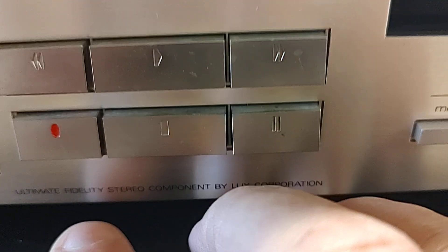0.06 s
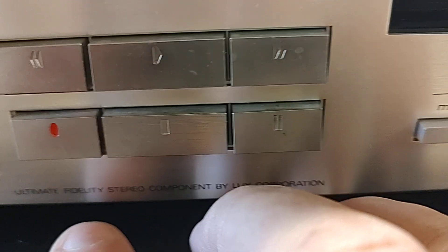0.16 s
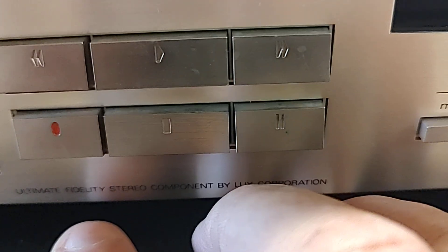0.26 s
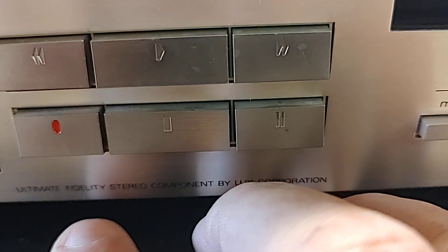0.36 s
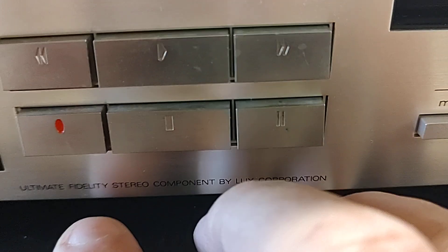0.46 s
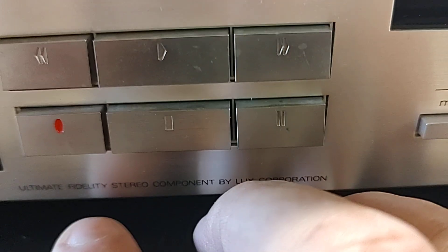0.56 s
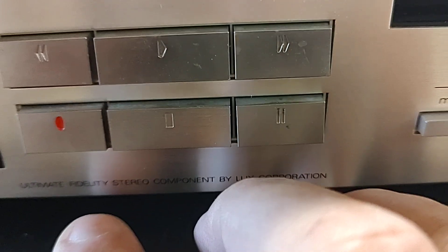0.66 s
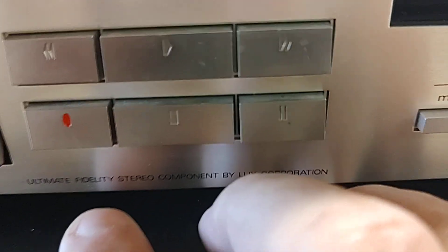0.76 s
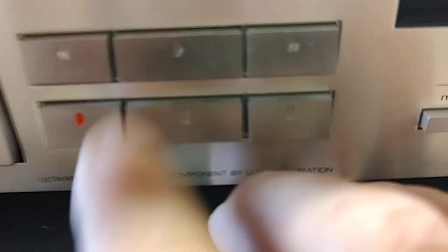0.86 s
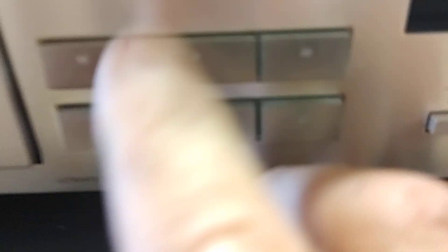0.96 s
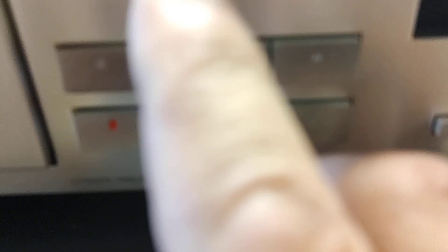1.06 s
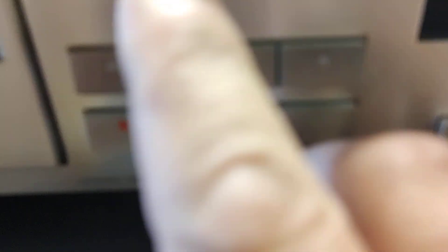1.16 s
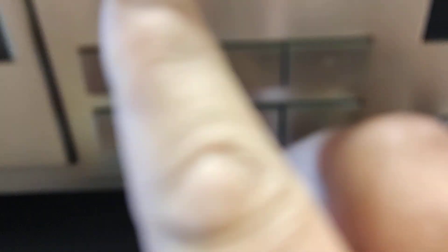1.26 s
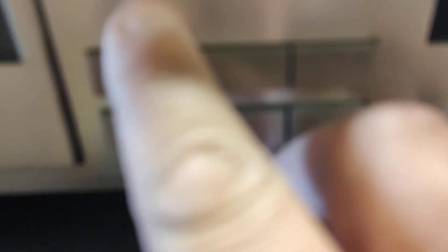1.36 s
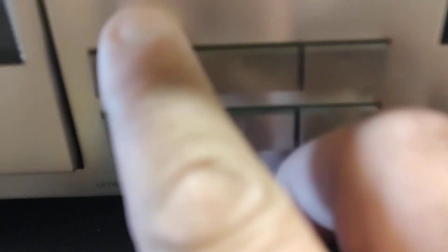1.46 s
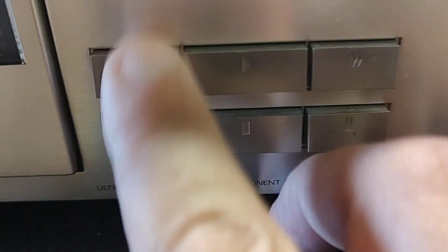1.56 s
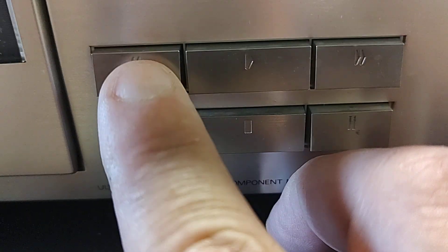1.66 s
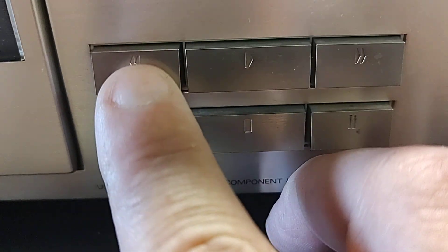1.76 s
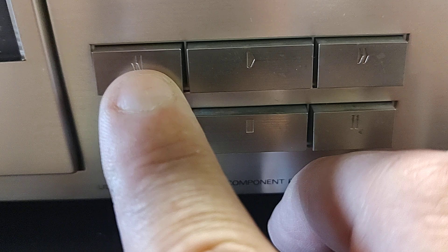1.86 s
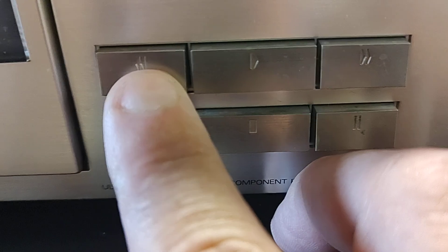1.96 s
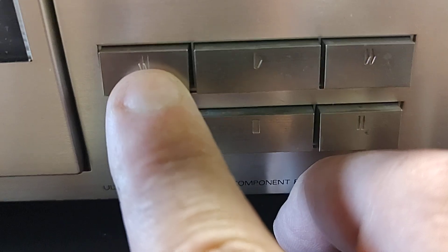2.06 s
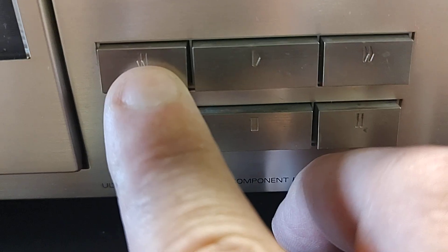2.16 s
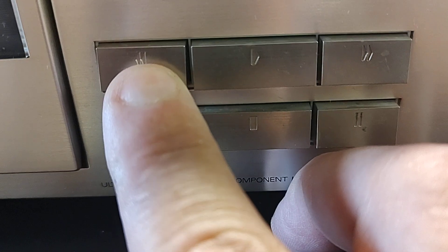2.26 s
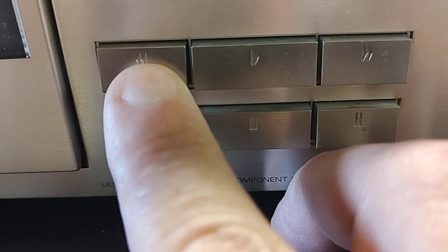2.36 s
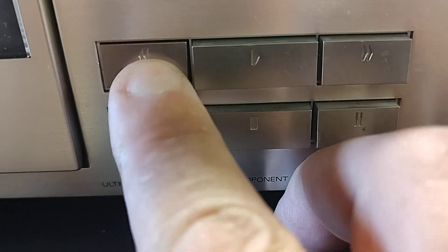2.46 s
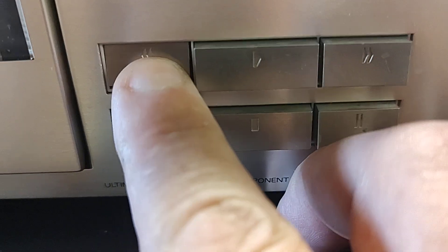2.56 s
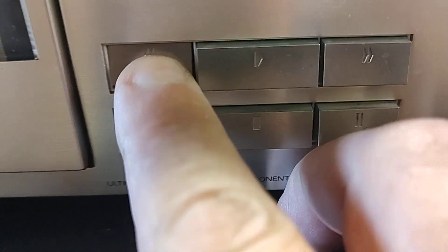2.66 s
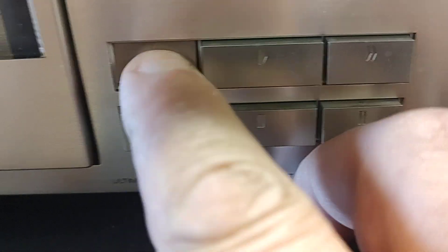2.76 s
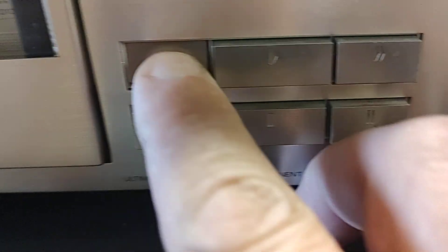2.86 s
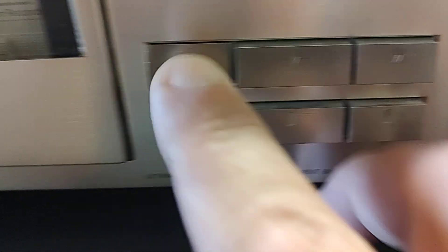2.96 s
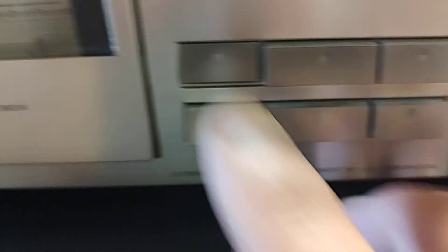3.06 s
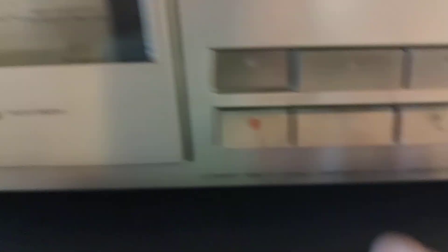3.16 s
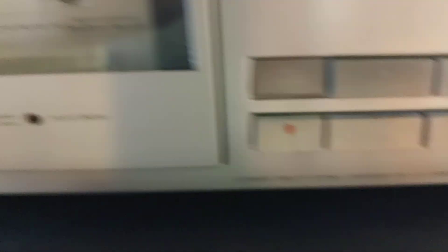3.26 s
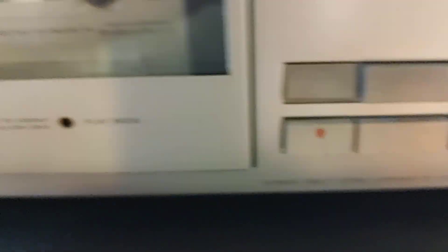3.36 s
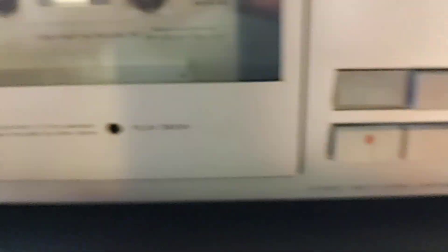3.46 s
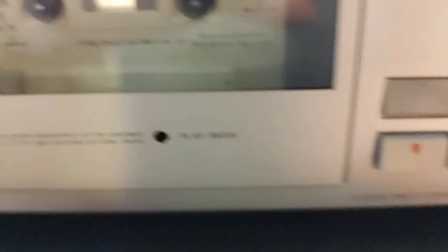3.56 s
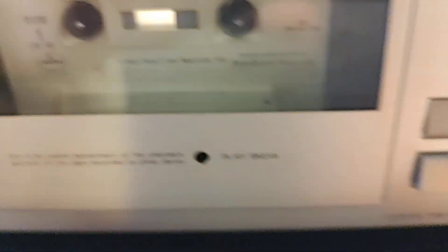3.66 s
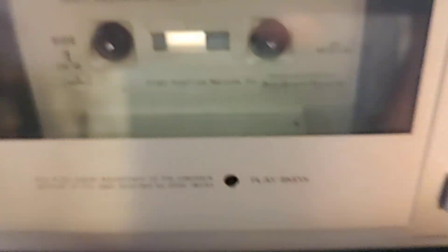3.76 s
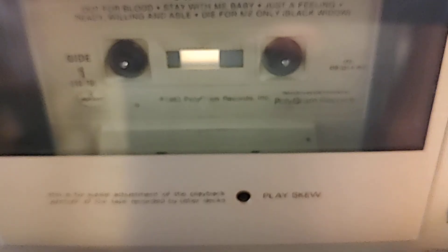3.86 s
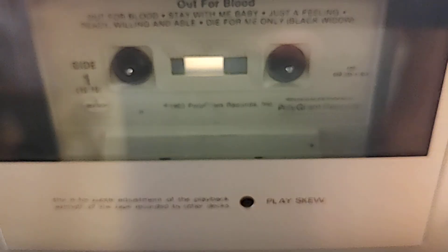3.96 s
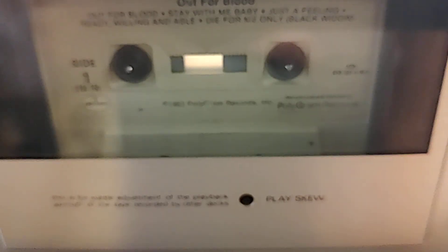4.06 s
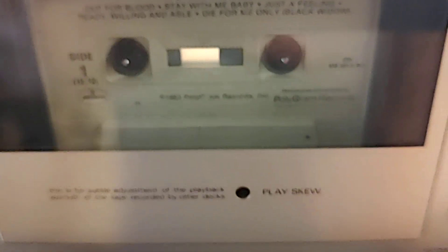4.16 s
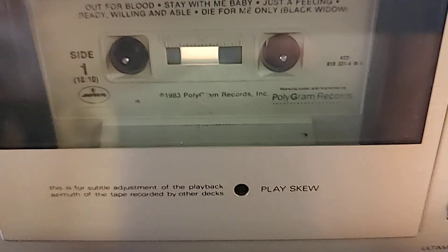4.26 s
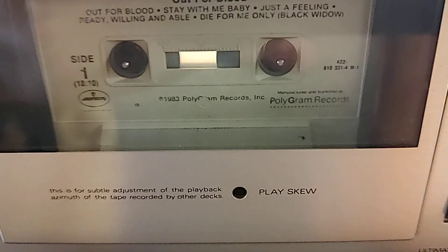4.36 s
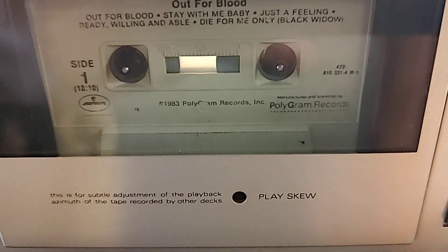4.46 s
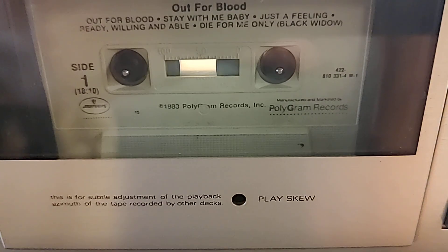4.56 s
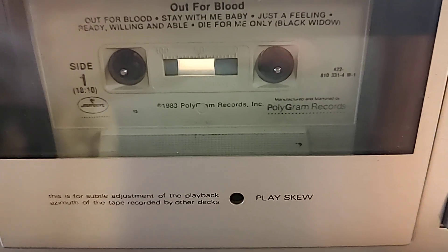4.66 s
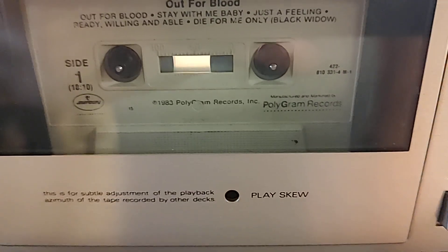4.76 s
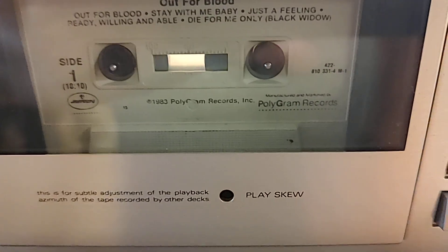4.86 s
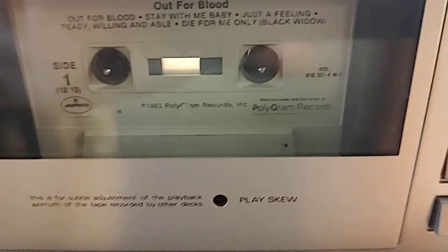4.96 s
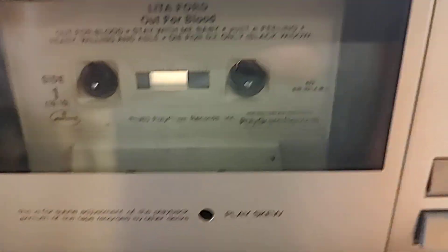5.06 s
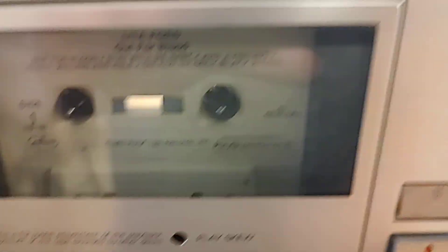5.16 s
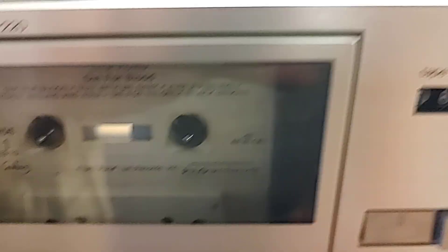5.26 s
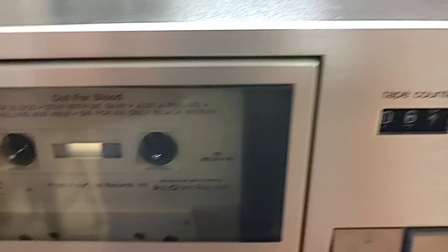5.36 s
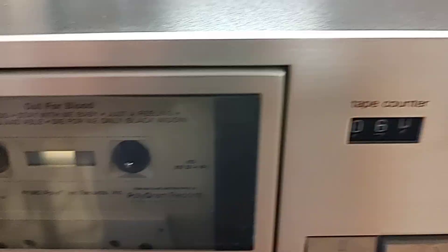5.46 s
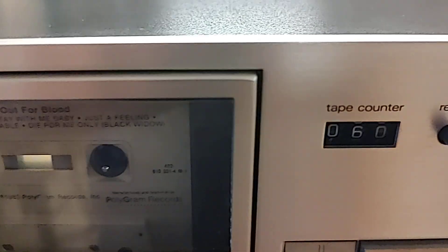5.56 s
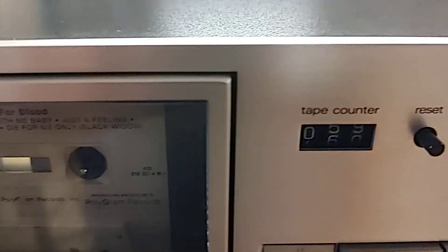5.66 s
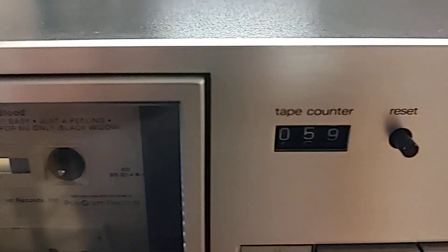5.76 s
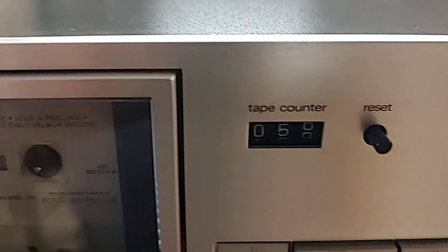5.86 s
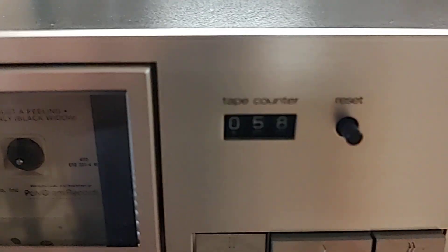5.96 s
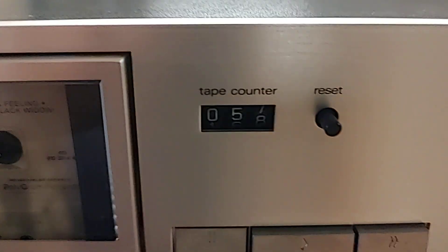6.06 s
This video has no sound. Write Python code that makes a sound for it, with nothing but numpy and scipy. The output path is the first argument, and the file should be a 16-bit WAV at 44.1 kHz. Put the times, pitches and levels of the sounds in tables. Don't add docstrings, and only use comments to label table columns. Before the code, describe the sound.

Close-up cassette deck: soft taps and a small tick, a sharp key slam, then steady rewinding whir with gear chatter, squeaks and handling thumps.

```python
import sys
import numpy as np
from scipy import signal
from scipy.fft import rfft, irfft, next_fast_len
from scipy.io import wavfile
from scipy.ndimage import uniform_filter1d

SR = 44100
rng = np.random.default_rng(int(sys.argv[2]) if len(sys.argv) > 2 else 0)


def persist_wave(psi):
    counts = np.round(np.clip(psi, -1, 1) * 32767).astype(np.int16)
    wavfile.write(sys.argv[1], SR, np.atleast_2d(counts).T)


def elevation(decibels):
    levels = np.asarray(decibels, float)
    return 10 ** (levels / 20)


N = 269451
M = next_fast_len(N + 4000, True)
T, HZ = np.arange(N) / SR, np.arange(M // 2 + 1) * SR / M + 1e-3
ENGAGE_S = 2.681
# hz, left_minus_right_db
FAR_BALANCE = [(60, 3.5), (150, 5), (380, 1.5), (950, 6.4), (2380, 5), (5980, 8), (15000, 18)]


def rms_one(x):
    return x / np.sqrt(np.mean(x ** 2) + 1e-20)


def in_time(rows):
    s, *columns = np.transpose(rows)
    return [np.interp(T, s, c) for c in columns]


def at_hz(points):
    hz, value = np.array(points).T
    return np.interp(np.log(HZ), np.log(hz), value)


def fade(start_s, end_s, length_s):
    return np.clip(np.minimum(T - start_s, end_s - T) / length_s, 0, 1)


def white():
    return rng.standard_normal((2, N))


def drift(rate):
    count = int(N / SR * rate * 2) + 2
    points = np.clip(rng.standard_normal(2400)[:count], -2, 2)
    return np.interp(T, np.linspace(0, N / SR, count), points)


def ripple(spacing_hz, depth_db):
    heights = np.clip(rng.standard_normal(600), -2, 2)
    return depth_db * np.interp(HZ, np.arange(600) * spacing_hz, heights)


def colour(x, db):
    cepstrum = irfft(db * np.log(10) / 20, M)
    cepstrum[1:M // 2] *= 2
    cepstrum[M // 2 + 1:] = 0
    filtered = irfft(rfft(x, M) * np.exp(rfft(cepstrum)), M)[..., :N]
    return filtered / np.sqrt(np.mean(elevation(db) ** 2))


def ring(x, hz, t60):
    r, w = elevation(-60 / (t60 * SR)), 2 * np.pi * hz / SR
    return signal.lfilter([0, np.sin(w)], [1, -2 * r * np.cos(w), r * r], x + 1e-18)


def wavering(hz, spread_hz, rate):
    return np.sin(2 * np.pi * np.cumsum(hz + spread_hz * drift(rate)) / SR)


def tones(lines, wobble_db, wander_hz):
    out = 0
    for k, (hz, db) in enumerate(lines):
        level = elevation(db + 2.5 + wobble_db * drift(6))
        out = out + level * np.sin(2 * np.pi * np.cumsum(hz + wander_hz * drift(9)) / SR + k)
    return out


def envelopes(rows, rise_s):
    out, t = np.zeros(N + SR), T[:SR // 4]
    for s, db, t60 in rows:
        out[round(s * SR):][:len(t)] += elevation(db - 60 * t / max(t60, .003)) * (1 - np.exp(-t / rise_s))
    return out[:N]


def ports(pair, balance, more_direct=0):
    # hz, share
    direct = [(60, 0.8), (200, 0.93), (400, .6), (900, 0.55), (2000, 0.42), (5000, .4), (9000, .25),
              (16000, 0.1)]
    # hz, turn_radians
    port_turn = [(60, 0), (270, -.35), (480, -.6), (780, -.5), (1000, .6), (1500, -.1), (2000, 0)]
    lag_s = 0.00036
    left, twin = rfft(pair, M)
    share = np.clip(at_hz(direct) + more_direct, 0, 1)
    late = np.exp(-1j * (2 * np.pi * HZ * lag_s + at_hz(port_turn)))
    right = share * late * left + np.sqrt(1 - share ** 2) * twin
    shadow = elevation(-at_hz(balance))
    both = 2 / np.sqrt(1 + shadow ** 2 + 2 * shadow * share)
    return irfft(both * np.array([left, shadow * right]), M)[:, :N]


def room():
    # pitch_hz, rms_db
    hum_lines = [(119.9, -60.5), (202.3, -72), (234.2, -71.5), (290.7, -81), (409.1, -87), (710.6, -93),
                 (829.0, -66.5), (947.5, -78), (1028, -79), (1066, -79), (1184, -86), (1227, -78)]
    # hz, db_per_hz
    rumble_shape = [(15, -62.5), (25, -31), (65, 0.5), (91, -15.5), (119, -2), (167, -7.5), (223, -7),
                    (334, -13.5), (418, -18.5), (700, -30), (910, -59.5), (1540, -120)]
    murmur_shape = [(240, -43.5), (400, -8.5), (522, -17), (753, -18), (831, -7), (896, -13), (1240, -12.5),
                    (1470, -29.5), (1600, -27.5), (2080, -64), (3520, -120)]
    rustle_shape = [(880, -27), (1500, -7), (1850, 2), (2760, -1.5), (3380, -4), (3830, -4), (5000, -22),
                    (8000, -22), (10400, -54), (17600, -120)]
    hiss_shape = [(3530, -23), (6000, -10), (6690, -29), (7590, -19), (11300, -13.5), (15800, 2)]
    # time_s, swell_db
    sway = [(0.0, -1), (0.6, 0.7), (0.8, -1.5), (1.45, -0.5), (1.85, 1), (2.3, -2), (2.65, 4.5), (3.1, -11),
            (3.7, 0), (6.1, -4)]
    sway_db, = in_time(sway)
    murmur_db = -66.5 + 1.34 * sway_db - 0.5 * np.clip((T - ENGAGE_S) / 0.37, 0, 1)
    rumble = elevation(-63.5 + sway_db + 1.0 * drift(42)) * colour(white(), at_hz(rumble_shape))
    murmur = elevation(murmur_db) * colour(white(), at_hz(murmur_shape))
    rustle = elevation(-78.5 + 0.6 * sway_db + 1.6 * drift(25)) * colour(white(), at_hz(rustle_shape))
    hiss = elevation(-87 + 6.5) * colour(white(), at_hz(hiss_shape))
    capstan = elevation(-5.5 * np.clip(T - ENGAGE_S, 0, 1)) * tones(hum_lines[5:], wobble_db=0.8, wander_hz=0.5)
    hum = tones(hum_lines[:5], wobble_db=2.5, wander_hz=0.51) + capstan
    less_direct_treble = -.22 * (HZ > 1300)
    return ports(rumble + murmur + rustle + hum, FAR_BALANCE, less_direct_treble) + hiss


def thumps():
    # start_s, peak_db, lowest_mode_rel_db, knock_rel_db
    blows = [
        (0.25, -51, 1, 3),
        (0.7, -51, -22, 6),
        (1.661, -46, -12, -5),
        (3.075, -44.5, -18, 3.5),
        (3.099, -43, -21, -4),
        (3.548, -26.5, -9, 2),
        (3.558, -27.5, 1, 2.5),
        (3.577, -39, -1, 7),
        (3.621, -37, 3, -3),
    ]
    # pitch_hz, t60_s
    table_modes = [(100, 0.2), (197, 0.24)]
    # hz, db_per_hz
    knock_shape = [(150, -28.5), (250, -4), (282, -21), (328, -20), (393, -9), (468, -9), (757, -14.5),
                   (1000, -16), (1300, -55), (2200, -120)]
    (low_hz, low_t60), (main_hz, main_t60) = table_modes
    low_push = envelopes([(s, db + rel - 40.5, .008) for s, db, rel, _ in blows], rise_s=0.00048)
    main_push = envelopes([(s, db - 24.0, .008) for s, db, _, _ in blows], rise_s=0.0019)
    knock = envelopes([(s, db + rel - 13.5, .09) for s, db, _, rel in blows], rise_s=0.0017) * white()
    snap = envelopes([(s, db + rel - 31.0, .004) for s, db, _, rel in blows], rise_s=0.00025)
    press_s = 3.597
    pressed = elevation(-5 * fade(press_s, press_s + press_s + .03, 0.0055))
    low, main = ring(low_push, low_hz, low_t60), ring(main_push, main_hz, main_t60)
    return low + pressed * main + ring(snap, 620, 0.014) + colour(knock, at_hz(knock_shape))


def relay_tick():
    ticks_s = [
        0.4397,
        1.7775,
    ]
    # delay_s, peak_db, t60_s, click_db
    tick_parts = [
        (0.0, -51, 0.05, -52),
        (.0052, -53, .06, -49),
        (0.0211, -55, 0.11, -36),
        (.0238, -57, .05, -38),
        (.0262, -58, .05, -42),
        (.0282, -60, .05, -46),
        (.0405, -62, .04, -53),
        (0.066, -61, .066, -60),
    ]
    # hz, db_per_hz
    tick_shape = [(400, -52), (750, -11), (830, 6), (1080, 3), (1230, 11.5), (1540, -20), (2000, 3.5),
                  (2400, 6), (3150, -13.5), (3900, -6.5), (4600, -20), (5200, -35), (5750, -30),
                  (6700, -44), (7700, -33), (8500, -37), (10000, -41), (16000, -69)]
    parts = []
    for k, start_s in enumerate(ticks_s):
        for lag, db, t60, click_db in tick_parts:
            early_s = 0.0012 * (k == 0 and lag > .01)
            softer_db = 7 * (k == 0)
            parts.append((start_s + lag - early_s, db, t60, click_db - softer_db))
    click_tone = sum(np.cos(2 * np.pi * hz * T) for hz in (2967, 4030, 5750, 7700))
    clicks = envelopes([(s, db, .005) for s, _, _, db in parts], rise_s=.00006) * click_tone
    scrape = envelopes([row[:3] for row in parts], rise_s=0.00086) * uniform_filter1d(white(), size=4)
    return colour(scrape * 1.28 + clicks, at_hz(tick_shape))


def finger_slips():
    # pitch_hz, level_db
    slip_modes = [(4000, -15), (4600, -27), (5500, -27), (6200, -34), (7300, -32), (8800, -40)]
    slips = envelopes([(1.572 + 0.033 * k, -69, 0.07) for k in range(5)], rise_s=0.002) * white()
    return sum(elevation(db) * ring(slips, hz, 0.009) for hz, db in slip_modes)


def finger_taps():
    # start_s, peak_db, ring_hz, ring_rel_db, treble_rel_db
    taps = [(.024, -64, 2000, -9, -5), (.046, -59, 2140, -17, -12), (0.088, -54.5, 1010, 6.5, -4),
            (.15, -70, 2100, -1, -12), (.378, -79, 2000, -1, -12), (1.718, -64, 2090, -3, -4),
            (0.271, -64, 1026, 13.5, -5), (0.714, -59.5, 970, 11.5, -10), (1.012, -66, 1270, 7, -13),
            (1.385, -62, 865, 8.5, -14), (1.518, -65.5, 2000, -16, 7), (1.981, -56.5, 1040, 8, -4),
            (2.056, -67, 2000, 3, -12), (2.102, -60.5, 2080, -2, -5), (2.353, -66, 984, 6, -15),
            (2.532, -65, 4220, -5, -10), (2.865, -42, 3400, -14, -20), (3.069, -46.5, 840, 8.5, -20),
            (3.092, -52, 780, 3, -25), (3.118, -52.5, 542, 6, -20), (3.278, -51, 610, 5, -22),
            (3.414, -36, 3700, -7, -26), (3.437, -40, 3400, -12, -26)]
    noise = white()
    rub = signal.sosfilt(signal.butter(4, [900, 4200], "band", fs=SR, output="sos"), noise)
    treble = colour(white(), ripple(spacing_hz=410.0, depth_db=1.5))
    out = 0
    for s, db, hz, ring_db, treble_db in taps:
        touch = envelopes([(s, db + 1.5, .09)], rise_s=0.0037)
        out = out + touch * (rub + elevation(treble_db - 14.5) * treble)
        out = out + elevation(ring_db - 20.5) * ring(touch * noise, hz, 0.05)
    return out


def slam():
    # start_s, peak_db, t60_s, bright_peak_db
    contacts = [(2.5736, -32.5, 0.054, -64), (2.581, -22.5, 0.043, -63), (2.583, -24, 0.047, -66),
                (2.59, -25, 0.035, -67), (2.6, -38, 0.11, -71), (2.6231, -14.5, 0.086, -46),
                (2.631, -21, 0.062, -41), (2.6363, -15, 0.052, -43), (2.64, 0, 0.016, -39),
                (2.643, -2, 0.016, -35), (2.6473, -33, 0.01, -15.5), (2.651, -15, 0.084, -48),
                (2.655, -27, 0.063, -48), (2.679, -21, 0.063, -55), (2.736, -25.5, 0.073, -56),
                (2.865, -44, 0.036, -54), (3.074, -31, 0.082, -56), (3.287, -28, 0.034, -48),
                (3.416, -51, 0.046, -47), (3.441, -52, 0.05, -44)]
    # start_s, peak_db, t60_s
    sparks = [
        (2.5325, -74, 0.02),
        (2.5795, -51, 0.038),
        (2.5842, -48, .02),
        (2.634, -43, .04),
        (2.640, -42, .04),
        (2.6485, -18.5, 0.0081),
        (2.652, -48, 0.1),
        (2.737, -59, .06),
    ]
    # pitch_hz, level_db, t60_s
    frame_modes = [(252, -16, 0.12), (351, -25, 0.18), (440, -21, 0.35), (528, -18, 0.42), (610, -12, 0.29),
                   (700, -13, 0.23), (810, -15, 0.12), (930, -13, 0.12), (1220, -11, 0.17),
                   (2000, -10, 0.19), (2662, 5.5, 0.05), (3400, -22, .03)]
    # start_s, pitch_hz, peak_db, t60_s
    seating = [(2.577, 1040, -35, 0.07), (2.601, 782, -38.5, 0.096), (2.617, 800, -43, .05),
               (2.628, 1271, -24.5, 0.08), (2.64, 946, -28, 0.062), (2.647, 839, -32.5, 0.15),
               (2.684, 821, -36, 0.11), (2.60, 224.8, -44, 0.25), (2.641, 285, -50, 0.13),
               (2.668, 260, -43.5, 0.16), (2.664, 566, -45, 0.19), (2.66, 1290, -43, 0.2),
               (2.732, 1230, -42.5, 0.11), (2.745, 700, -46, 0.16), (2.79, 250, -56.5, 0.23),
               (2.8657, 3400, -34.5, 0.045), (2.8655, 2000, -39, .05), (3.4155, 3300, -36, 0.046),
               (3.4385, 3100, -32, 0.048), (3.445, 3450, -33, 0.049), (3.459, 3690, -38, .04)]
    # hz, db_per_hz
    slam_shape = [(100, -74), (210, -34), (270, -15), (480, -9.5), (700, -7.5), (840, 5), (1260, 1),
                  (1650, -6), (2000, 0.5), (2700, -1.5), (3300, -6.5), (3900, -4.5), (5050, -17.5),
                  (9080, -20.5), (12400, -36), (16000, -32.5)]
    dull = envelopes([(s, db - 11.0, t60) for s, db, t60, _ in contacts], rise_s=0.0019) * white()
    bright = envelopes([(s, db, 0.87 * t60) for s, _, t60, db in contacts], rise_s=0.0037) * white()
    sparkle = envelopes(sparks, rise_s=0.0008) * white()
    shape_db = at_hz(slam_shape)
    high, top = 1 / (1 + (4800 / HZ) ** 12), 1 / (1 + (9000 / HZ) ** 8)
    crack = colour(dull, shape_db + 20 * np.log10(1.001 - high))
    snap = colour(bright, shape_db + 20 * np.log10(high * (1 - top) + 1e-4) - 4.0)
    snap = snap + colour(sparkle, shape_db + 20 * np.log10(top + 1e-4))
    modes = sum(ring(dull, hz, t60) * elevation(db - 38) * (-1) ** k
                for k, (hz, db, t60) in enumerate(frame_modes))
    parts = 0
    for s, hz, db, t60 in seating:
        swell = envelopes([(s, db, t60)], rise_s=0.003)
        parts = parts + swell * np.sin(2 * np.pi * hz * T) * elevation(4.0 * drift(80))
    return crack + snap + modes + parts


def hub(beads):
    # start_s, peak_db
    bind_events = [(3.3482, -46.5), (3.4076, -43), (3.4435, -41), (3.4874, -46), (3.6515, -50),
                   (3.8451, -42), (3.8745, -43), (3.907, -50), (3.9533, -37), (3.9833, -47), (4.0122, -53),
                   (4.0646, -35.5), (4.0915, -40), (4.1534, -42.5), (4.2148, -41.5), (4.2951, -44.5),
                   (4.4901, -43), (4.559, -40.5), (4.6054, -47), (4.6747, -56), (4.7191, -48),
                   (4.7635, -56), (4.8279, -36.5), (4.8782, -44), (4.9117, -39), (4.9361, -48),
                   (4.976, -44), (5.0284, -39), (5.0459, -40), (5.0683, -56), (5.1167, -40), (5.1337, -38),
                   (5.1521, -34.5), (5.2329, -49), (5.2748, -37), (5.3646, -45), (5.4634, -47),
                   (5.5582, -48), (5.8056, -43), (5.9922, -45)]
    squeak_hz = 3905
    rub = rms_one(ring(ring(beads, squeak_hz - 35, 0.03), squeak_hz + 20, 0.03))
    squeal = wavering(squeak_hz, 24.0, 70) * elevation(3.7 * drift(90))
    binds = envelopes([(s - .005, db + 8.0, 0.055) for s, db in bind_events], rise_s=0.009)
    return (elevation(-63) + fade(3.7, 5.63, 0.16) * elevation(-59.5)) * rub + binds * squeal


def teeth():
    # start_s, peak_db
    catches = [(3.7063, -43), (3.9837, -40), (4.1009, -39), (4.1314, -40), (4.2182, -42), (4.2471, -45),
               (4.2765, -40), (4.3349, -41), (4.3878, -33), (4.4227, -41), (4.51, -36), (4.5973, -42),
               (4.6851, -49), (4.7085, -46), (4.742, -44), (4.8377, -38), (4.8856, -38), (4.9106, -33),
               (4.9455, -40), (5.0123, -31.5), (5.0358, -34), (5.2079, -41), (5.2608, -41), (5.2997, -41),
               (5.3177, -44), (5.372, -37), (5.4124, -36), (5.4414, -38), (5.4703, -39), (5.4977, -46)]
    return envelopes([(s - .004, db + 5.0, 0.048) for s, db in catches], rise_s=.008) * wavering(1967, 30.0, 40)


def panel_gaps(beads):
    # from_s, to_s, pitch_hz, t60_s
    gap_rows = [(2.75, 3.4, 4700, .012), (3.3, 3.85, 9300, .007), (3.7, 5.75, 5480, .018),
                (3.9, 6.3, 8500, .007), (5.4, 6.3, 11650, .007), (5.6, 6.3, 6150, .005),
                (2.75, 4.2, 1840, .02), (3.8, 5.6, 1980, .03), (3.6, 5.6, 2800, .03), (5.2, 6.3, 1900, .02),
                (3.2, 3.55, 3300, .008), (4.0, 5.4, 9950, .008), (5.3, 6.3, 3370, .02),
                (5.6, 6.3, 7400, .004), (2.75, 3.6, 1400, .03), (4.3, 5.25, 3840, .06),
                (2.75, 3.6, 2290, .04), (5.3, 6.3, 2280, .04), (5.3, 6.3, 2650, .03),
                (2.75, 3.6, 5290, .02), (2.75, 3.6, 5990, .02), (3.7, 5.4, 5010, .015),
                (5.4, 6.3, 3940, .03), (2.75, 3.6, 3830, .03), (2.75, 3.6, 6350, .015)]
    gap_levels = [-66.5, -67, -66.5, -79, -72, -61.5, -57.5, -52.5, -55.5, -54, -46.5, -81, -58.5, -62,
                  -55.5, -71, -64, -59, -62.5, -70.5, -75, -68.5, -63.5, -65.5, -80]
    return sum(fade(start, end, 0.26) * elevation(db) * rms_one(ring(beads, hz, t60))
               for (start, end, hz, t60), db in zip(gap_rows, gap_levels))


def whir():
    # time_s, nearness_to_gears_db, view_of_tape_window_db
    path = [(2.7, 6, -3), (2.8, -3, -6), (3.1, -2.5, -15), (3.28, -1.5, 0.5), (3.46, 0, 4.5),
            (3.7, 0.8, -1), (4.0, 0.6, -3), (4.35, 1, -5.5), (4.6, 3, -5), (5.05, 1.5, -0.5), (5.3, 2.2, 5),
            (5.5, 1.2, 8), (5.75, -0.4, 2), (6.11, 0.5, 7)]
    # time_s, turns_per_s
    shaft = [(2.7, 34.0), (3.3, 34.15), (4.7, 34.15), (5.3, 34.8), (6.11, 34.9)]
    # start_s, peak_db
    snag_events = [(3.4137, -53), (3.9155, -42), (3.947, -38.5), (4.0048, -42), (4.098, -42), (4.2079, -47),
                   (4.2687, -50), (4.297, -39), (4.3605, -37), (4.412, -38), (4.622, -37), (4.7501, -38),
                   (4.91, -31.5), (5.047, -32), (5.0859, -53), (5.1153, -36), (5.1727, -38), (5.256, -40),
                   (5.2869, -50), (5.3156, -40), (5.462, -38.5), (5.658, -37), (5.724, -41), (5.803, -36),
                   (5.863, -39), (5.922, -41), (5.949, -37), (6.004, -38), (6.064, -37)]
    # pitch_hz, rms_db
    gear_lines = [(230, -73), (293.5, -76), (348.5, -65), (459.5, -72), (701, -62.5), (805, -64),
                  (922, -63), (964, -65.5), (1040, -59.5), (1056, -62), (1398, -59.5), (1148, -70),
                  (1263, -61.5), (1380, -59.5)]
    # pitch_hz, width_hz, level_db
    panel_modes = [(1020, 29, 9.5), (1067, 62, -7.5), (1176, 21, 3), (1422, 61, 3.5), (1452, 28, -9.5),
                   (1500, 30, 2.5), (1596, 65, -9.5), (1803, 51, 2.5), (1947, 48, 4), (2740, 55, 3),
                   (2100, 99, -1), (2303, 28, 2.5), (2360, 62, -11), (2560, 60, 2), (2740, 72, 3.5),
                   (2930, 37, -2), (3080, 45, 6.5), (3170, 110, -9), (3270, 100, 6), (3470, 40, -10),
                   (3516, 36, 6.5), (3700, 86, 4), (4350, 98, 7)]
    # hz, db_per_hz
    chassis_shape = [(150, -37.5), (250, -24.5), (347, -11.5), (382, -43.5), (542, -24.5), (690, -6),
                     (858, -9), (1030, -1.5), (1590, -0.5), (1950, -0.5), (3530, -10.5), (3940, -11.5),
                     (4500, -24), (5850, -28), (9900, -120)]
    shell_shape = [(2530, -45), (4300, 4), (4700, 3), (5080, -1.5), (5570, -6), (6740, -3.5), (7940, -5),
                   (8610, -2.5), (10800, -7.5), (11900, -7.5), (12600, -23), (13500, -9)]
    tape_shape = [(9000, -48), (13000, -13), (14300, -21), (15000, -2), (15600, 3), (16000, -6)]
    # hz, left_minus_right_db
    deck_balance = [(60, 10), (200, 6.5), (450, 13), (750, 7.5), (1050, 6.5), (1500, 16), (2100, 13),
                    (3000, 11), (4200, 8.5), (6300, 4), (10000, 24), (15000, 46)]
    near_db, view_db = in_time(path)
    gear_db = -52 + 0.74 * near_db + 0.017 * view_db
    chassis_db = -47 + 0.34 * near_db + 0.17 * view_db
    shell_db = -61 + 0.12 * near_db + 0.39 * view_db
    tape_db = -63 + 0.1 * near_db + 0.54 * view_db
    running = np.clip((T - ENGAGE_S) / 0.096, 0, 1)
    turn = 2 * np.pi * np.cumsum(in_time(shaft)[0]) / SR
    turn = turn - turn[round(4.1612 * SR)]
    settled = np.clip((T - 3.1) / .6, .4, 1)
    mesh_db = settled * (1.5 * np.cos(turn) + 1.3 * np.cos(3 * turn) + .6 * np.cos(5 * turn))
    throb_db = settled * (1.5 * np.cos(turn + 1.1) + 2.2 * np.cos(2 * turn + 3))
    snags = envelopes([(s - .001, db + 47.5, .045) for s, db in snag_events], rise_s=.004)
    body = at_hz(chassis_shape)
    for hz, width, db in panel_modes:
        body = body + db / (1 + (2 * (HZ - hz) / width) ** 2)
    low = 1 / (1 + (HZ / 1600) ** 12)
    shell = at_hz(shell_shape) + ripple(spacing_hz=110.8, depth_db=3.5)
    layers = [(body + 20 * np.log10(low + 1e-4), gear_db + 0.12 * mesh_db, .15),
              (body + 20 * np.log10(1.0001 - low), chassis_db + mesh_db, .3),
              (shell, shell_db + throb_db, 0.9)]
    out = tones(gear_lines, wobble_db=2.0, wander_hz=6.9) * elevation(gear_db + 49.5)
    for shape_db, db, snag_share in layers:
        flicker_db = 2.28 * drift(150) + 0.28 * drift(19)
        grains = white() * elevation(db + flicker_db) * (1 + snag_share * snags)
        out = out + elevation(-0.5) * colour(grains, shape_db)
    beads = white() * elevation(1.5 * mesh_db + 1.2 * drift(40)) * (1 + 0.7 * snags)
    tape = white() * elevation(.3 * throb_db) * (1 + .25 * snags)
    out = out + hub(beads) + teeth() + panel_gaps(beads)
    out = out + elevation(tape_db) * colour(tape, at_hz(tape_shape))
    return ports(running * out, deck_balance)


def scene():
    # hz, left_minus_right_db
    key_balance = [(60, -3), (290, 8), (700, 1.5), (1100, 5), (1500, 13), (2100, 17), (3100, 17),
                   (5000, 5.5), (10000, 20), (15000, 6)]
    tail_balance = [(60, -1), (500, -3), (1100, -2), (1500, 1), (2100, 9), (4000, 9), (6500, 4), (15000, 3)]
    steady, blow = room() + whir(), slam()
    tail = fade(2.647, 2.72, .008)
    small_sounds = relay_tick() + finger_slips() + finger_taps()
    keys = ports((1 - tail) * blow + small_sounds, key_balance, more_direct=0.1)
    return steady + keys + ports(tail * blow, tail_balance) + ports(thumps(), FAR_BALANCE)


def roll_off(x):
    return signal.sosfilt(signal.butter(12, 17000, fs=SR, output="sos"), x)


def record(dry):
    mix = signal.sosfilt(signal.butter(6, 71.3, "high", fs=SR, output="sos"), dry)
    mix = mix + elevation(-35.5) * dry
    mix = irfft(rfft(mix, M) * (HZ < 15800), M)[:, :N]
    return roll_off(mix)


dry = scene()
out = record(dry)
persist_wave(out)
```